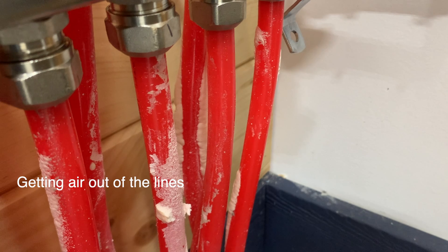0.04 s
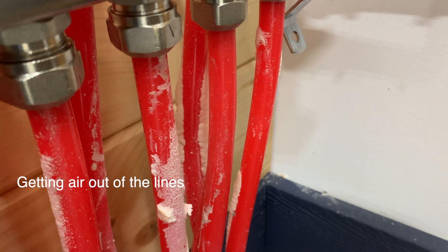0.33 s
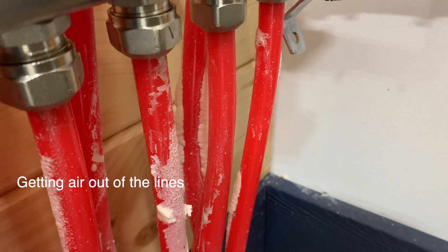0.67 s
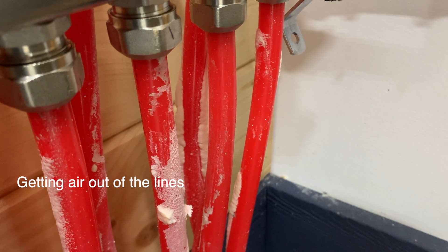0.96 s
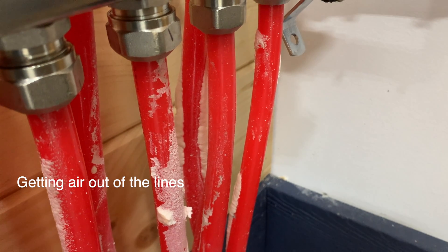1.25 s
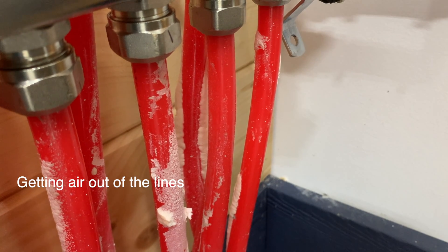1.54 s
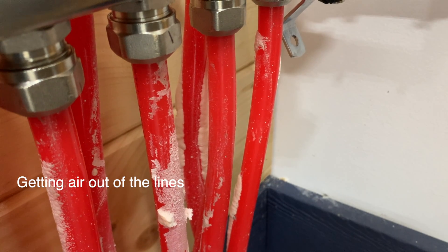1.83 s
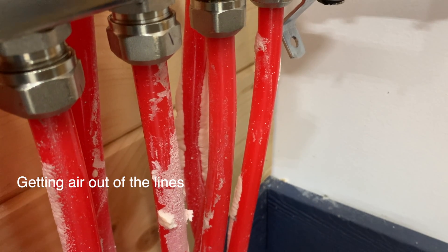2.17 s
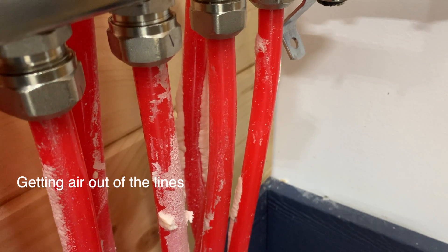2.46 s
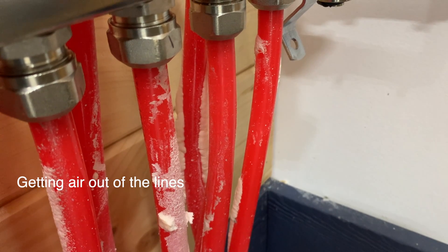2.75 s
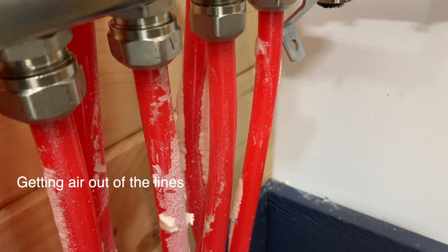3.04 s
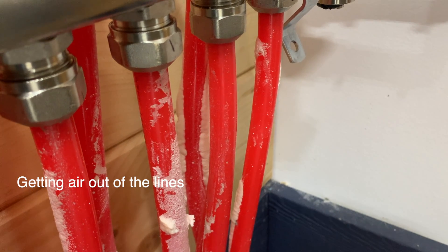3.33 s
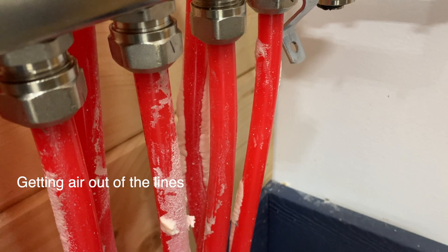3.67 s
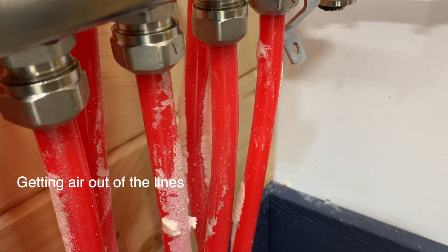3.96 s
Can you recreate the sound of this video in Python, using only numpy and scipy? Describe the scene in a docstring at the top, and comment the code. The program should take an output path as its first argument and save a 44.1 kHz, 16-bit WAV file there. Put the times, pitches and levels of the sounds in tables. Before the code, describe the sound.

Water rumbling and rushing through pipes, with gurgles of air over a steady pump hum.

```python
"""A small utility room, a stereo microphone close to plastic heating pipes being flushed of air.
From the start the pumped water surges in a deep rumble on the right, rushes and bubbles through the pipes
and hisses in the valves, over the pump's steady hum and thin whine. Air spits through a valve at once;
then low gurgles and higher spurts of fizz come and go, and air pockets churn the flow, hardest near 1.2 s.
The loudest gurgle comes near 2.75 s, and the water runs on to the end."""
import sys
import numpy as np
from scipy import signal
from scipy.fft import rfft, irfft
from scipy.io import wavfile
from scipy.ndimage import uniform_filter1d

SR = 44100
rng = np.random.default_rng(int(sys.argv[2]) if len(sys.argv) > 2 else 0)


def output_pcm(signal):
    """Save a mono or channel-first signal as 16-bit PCM at the path in sys.argv[1].

    Samples are clipped to [-1, 1] before scaling.
    """
    pcm = np.clip(np.atleast_2d(signal).T, -1, 1) * 32767
    wavfile.write(sys.argv[1], SR, np.round(pcm).astype(np.int16))


N = 176400
TIME = np.arange(N) / SR
FREQS = np.maximum(np.arange(N // 2 + 1) * SR / N, .1)


def undb(db):
    """Decibels to gain."""
    return 10 ** (np.asarray(db) / 20)


def colour(points):
    """Gain that gives white noise a spectrum of (frequency [Hz], density [dB per Hz]) points."""
    hz, db = np.array(points).T
    return undb(np.interp(np.log(FREQS), np.log(hz), db)) * np.sqrt(SR / 2)


def resonances(modes):
    """Gain of steep-sided resonances, each passing white noise at its own level."""
    power = 0
    for hz, width, db in modes:
        peak = 1 / (1 + ((FREQS / hz - hz / FREQS) * hz / width) ** 2) ** 2
        power = power + undb(db) ** 2 * peak / peak.mean()
    return np.sqrt(power)


def walk(hz):
    """Smooth random wander of spread 1."""
    hold = max(int(SR / hz), 2)
    steps = np.repeat(rng.standard_normal(N // hold + 2), hold)
    smooth = uniform_filter1d(uniform_filter1d(steps, hold), hold)[:N]
    return (smooth - smooth.mean()) / smooth.std()


def drift(sound, share, hz):
    """Let the pitch of a sound wander by a small share."""
    samples = np.arange(N)
    place = samples + np.cumsum(share * walk(hz))
    return np.array([np.interp(place, samples, side) for side in sound])


def ring(sound, t60_s, tail_db, channels):
    """Direct sound plus a dense decaying tail, at unchanged power."""
    tail = rng.standard_normal((channels, N)) * np.exp(-np.log(1000) * TIME / t60_s)
    tail *= undb(tail_db) / np.sqrt((tail ** 2).sum(axis=1, keepdims=True))
    return irfft(rfft(sound) * (1 + rfft(tail)) / np.sqrt(1 + undb(tail_db) ** 2), N)


def pan(db):
    """Channel gains that put the left db above the right."""
    return undb(np.array([[db], [-db]]) / 2)


# how the pipes reach the microphone's two sides (frequency [Hz], likeness [0-1], left lead [rad])
MIC_PATHS = [(40, .6, -.4), (58, .62, 1), (80, .92, 1.8), (125, .6, 3.2), (170, .7, 4.9), (250, .78, 5.7),
             (315, .78, 7.2), (430, .55, 9.9), (510, .6, 10), (660, .78, 8), (760, .9, 8.2),
             (1000, .68, 7.9), (1300, .55, 7), (1650, .75, 3.9), (2150, .55, 5.6), (2500, .25, 7.4),
             (2950, .55, 8.5), (3900, .25, 14), (5500, .2, 10.5), (7000, .42, 8.3), (8300, .45, 8.2),
             (8650, .7, 6.8), (9000, .95, 6.3), (9600, .95, 6.3), (10400, .85, 5), (15000, .8, 5)]

def mic_paths():
    """Likeness of the two sides and phase lead of the left, at every frequency."""
    hz, likeness, lead = np.array(MIC_PATHS).T
    return [np.interp(np.log(FREQS), np.log(hz), column) for column in (likeness, lead)]


def at_mic(sound):
    """One sound on both sides of the microphone, shifted in phase."""
    _, lead = mic_paths()
    return np.array([irfft(rfft(sound) * np.exp(1j * lead), N), sound])


def turbulence(gain):
    """Coloured noise on both sides of the microphone, partly alike and shifted in phase."""
    likeness, lead = mic_paths()
    right, unrelated = rfft(rng.standard_normal((2, N)))
    left = (likeness * right + np.sqrt(1 - likeness ** 2) * unrelated) * np.exp(1j * lead)
    return irfft(np.array([left, right]) * gain, N)


# the two low resonances of the pipe run (frequency [Hz], width [Hz], gain [dB])
PIPE_RUN_MODES = [(56.5, 17.5, 1.07), (80.5, 16.9, 0.3)]
# surges of the lower resonance (time [s], level [dB])
LOWER_SURGES = [(0.0, -38), (0.18, -31.5), (0.25, -40.5), (0.49, -30.5), (0.55, -35), (0.66, -33),
                (0.81, -42), (0.89, -23.0), (0.94, -41), (1.13, -28.5), (1.18, -42), (1.24, -28),
                (1.34, -38.5), (1.48, -36.5), (1.55, -39), (1.61, -28.5), (1.7, -39), (2.06, -29),
                (2.1, -40), (2.29, -28), (2.49, -38.0), (2.55, -26.5), (2.85, -33.5), (2.89, -32),
                (3.04, -38.5), (3.33, -31.5), (3.54, -38), (3.78, -29), (3.96, -32.5), (4.0, -33)]
# surges of the upper resonance (time [s], level [dB])
UPPER_SURGES = [(0.0, -33.5), (0.07, -29), (0.32, -38.5), (0.55, -31), (0.82, -36.5), (0.87, -32.5),
                (1.08, -37.5), (1.19, -28), (1.38, -34.5), (1.43, -32), (1.74, -34), (1.79, -42),
                (1.96, -34.5), (2.01, -53), (2.05, -25), (2.09, -39), (2.19, -30), (2.29, -35.5),
                (2.38, -33.0), (2.49, -46), (2.53, -29.5), (2.62, -46), (2.69, -33), (2.87, -29),
                (2.92, -41), (3.06, -27), (3.15, -36.5), (3.39, -26.0), (3.46, -34.5), (4.0, -39.5)]

def rumble():
    """Surging flow shakes the pipe run right of the microphone, each resonance swelling in its own time."""
    out = 0
    for (hz, width, db), surges in zip(PIPE_RUN_MODES, (LOWER_SURGES, UPPER_SURGES)):
        shake = turbulence(resonances([(hz, width, db)]))
        envelope = np.sqrt(uniform_filter1d(np.abs(signal.hilbert(shake[1])) ** 2, int(SR * 0.047)))
        shake = shake / envelope ** 0.7 * pan(-14.5)  # partly evened out, so the surges lead
        surge_db = np.interp(TIME, *np.array(surges).T)
        out = out + shake / shake.std() * undb(0.27 + db + surge_db)
    low_hz, high_hz = 39.8, 91.4
    band_loss = (1 + (low_hz / FREQS) ** 12) * (1 + (FREQS / high_hz) ** 16)
    return irfft(rfft(out) / np.sqrt(band_loss), N)


# water rushing in the pipes, close up (frequency [Hz], relative density [dB])
RUSH_SPECTRUM = [(20, -112), (45, -86), (95, -66), (110, -68), (135, -67), (165, -71.5), (185, -70),
                 (215, -73), (270, -74), (320, -68.5), (365, -70), (440, -69.5), (540, -81), (590, -75),
                 (780, -80), (850, -85), (1000, -81), (1450, -82), (1560, -80), (1680, -85), (2000, -84.5),
                 (2250, -85), (2400, -88), (3500, -94), (4600, -96), (9000, -110)]
FLUTTER_HZ = 22

def rush(churn_db):
    """Churning water, with its bubbles and ringing fittings, flutters in level; the small room answers."""
    water = turbulence(colour(RUSH_SPECTRUM)) * undb(0.5) + bubbles()
    pipes = water * undb(0.95 * churn_db) + gurgles() + fittings(churn_db)
    flutter = undb(0.72 * walk(FLUTTER_HZ))
    return ring(pipes * flutter, t60_s=0.32, tail_db=-5.5, channels=2)


# swarms of air bubbles (centre [Hz], spread each way [octaves], rate [1/s], ring [cycles], level [dB])
BUBBLE_SWARMS = [(348.4, 0.227, 12, 30, -60), (1305, 0.133, 45, 100, -62.5), (1962, 0.133, 45, 95, -62)]

def bubbles():
    """Air bubbles ring at random moments, each rising a little in pitch as it dies."""
    scatter_db, chirp = 0.5, 0.03
    out = np.zeros(N)
    for centre_hz, spread, rate, cycles, db in BUBBLE_SWARMS:
        swarm = np.zeros(N)
        for when, pitch_draw, size_draw in rng.random((400, 3))[:int(rate * N / SR)]:
            hz = centre_hz * 2 ** (spread * (2 * pitch_draw - 1))
            start = int(when * N)
            length = min(int(cycles / hz * SR), N - start)
            age = np.arange(length) * hz / SR / cycles  # 0 to 1 over the ring
            envelope = np.exp(-np.log(100) * age) * (1 - np.exp(-age * cycles / 2))
            strength = undb(-scatter_db * np.log(1 - .97 * size_draw))
            tone = np.sin(2 * np.pi * cycles * age * (1 + chirp * age))
            swarm[start:start + length] += strength * envelope * tone
        out += swarm / swarm.std() * undb(db)
    return at_mic(out)


# resonances of pipes and fittings (frequency [Hz], width [Hz], level [dB])
FITTING_MODES = [(314, 35, -59), (455, 47, -66), (648.6, 18, -63), (700, 13, -66), (755, 61, -60.5),
                 (1135, 52, -63), (1223, 39, -63.5), (1288, 56, -58), (1380, 180, -64.5), (1756, 37, -63.5),
                 (1805, 45, -59), (1928, 75, -59.5), (2255, 31, -67.5), (2936, 280, -60)]

def fittings(churn_db):
    """The flow rings pipes and fittings, which waver in pitch and flare as air passes through."""
    drive = rfft(turbulence(1))
    out = 0
    for mode in FITTING_MODES:
        ringing = drift(irfft(drive * resonances([mode]), N), share=0.003986, hz=12)
        out = out + ringing * undb(2.13 * walk(hz=16) + 0.21 * churn_db)
    return out


# hiss of the valves, close up (frequency [Hz], relative density [dB])
HISS_SPECTRUM = [(2000, -102), (4150, -89), (4550, -93.5), (5400, -90), (5900, -87.5), (7000, -86.5),
                 (8300, -91), (9200, -86.5), (10250, -88), (10700, -122), (12200, -101), (12900, -91),
                 (13500, -104), (15500, -104)]
# resonances of the valve bodies (frequency [Hz], width [Hz], level [dB])
VALVE_BODY_MODES = [(3264, 67, -68), (4170, 110, -74.5), (5000, 98, -79), (5680, 130, -69),
                    (6370, 160, -64.5), (6817, 64, -62.5), (7040, 130, -71.5), (7170, 160, -67.5),
                    (7960, 70, -65), (8500, 70, -71.5), (9100, 80, -64.5), (9420, 120, -72.5),
                    (10000, 46, -84), (10300, 300, -64)]

def hiss(churn_db):
    """Water squeezes through the valves; the metal rings briefly with it."""
    valves = ring(turbulence(colour(HISS_SPECTRUM)), t60_s=0.17, tail_db=-3.5, channels=1)
    drive = rfft(turbulence(1))
    for mode in VALVE_BODY_MODES:
        valves = valves + irfft(drive * resonances([mode]), N) * undb(3 * walk(hz=9.2))
    return valves * undb(-2 + 0.2 * churn_db + 0.5 * walk(FLUTTER_HZ))


# mains hum, rotor and whine (frequency [Hz], level [dB], left over right [dB], left lead [rad])
PUMP_TONES = [(120, -51.5, -14, -2), (195.2, -52.5, -4.5, -0.98), (241, -61.5, 3.5, -1.3),
              (360, -60, -3, -1.6), (389, -57, -0.5, 2), (1018, -69.5, 0, 0.7), (2139, -64, 7.5, -1.8)]

def pump():
    """Steady tones of the pump, wavering slightly with its load."""
    drifting_time = np.cumsum(1 + 0.00062 * walk(hz=5.05)) / SR
    out = 0
    for hz, db, pan_db, lead in PUMP_TONES:
        phase = 2 * np.pi * (hz * drifting_time + rng.random()) + np.array([[lead], [0]])
        level = undb(db + 2.6 * walk(hz=13))
        out = out + np.sqrt(2) * np.sin(phase) * level * pan(pan_db)
    return out


# valve metal rung by a spit of air (frequency [Hz], width [Hz], level [dB])
SPIT_RESONANCES = [(707, 31, -43), (1290, 90, -47), (4430, 110, -50), (5440, 2200, -50)]

def spit():
    """A pocket of air spits through a valve and rings the metal."""
    start_s, attack_s, decay_s = 0.0071, 0.015, 0.06
    age = np.maximum(TIME - start_s, 0)
    envelope = np.minimum(age / attack_s, 1) * np.exp(-age / decay_s)
    return turbulence(resonances(SPIT_RESONANCES)) * envelope


# low gurgles and short, higher spurts of fizzing bubbles (time [s], pitch [Hz], half-length [s], level [dB])
GURGLES = [(0.127, 319.5, 0.024, -49), (.59, 337, 0.031, -51), (0.934, 323, 0.042, -48),
           (1.15, 305.4, 0.051, -54), (1.19, 447, .05, -53), (1.944, 311, .03, -51),
           (2.287, 319.4, .03, -50.5), (2.49, 306, 0.022, -47), (2.544, 292, 0.038, -48.5),
           (2.75, 310.4, 0.065, -45), (3.01, 338, 0.049, -50.5), (3.165, 303, .025, -50),
           (.78, 1960, .035, -56), (1.12, 721, .04, -49), (1.15, 1290, 0.081, -62),
           (1.584, 1300, 0.047, -57), (1.656, 1258, .06, -57), (2.24, 1266, .07, -57.5),
           (2.48, 1278, 0.029, -58), (2.83, 1836, 0.033, -59), (3.348, 1914, 0.046, -59),
           (3.375, 1262, 0.077, -59), (3.61, 1286, 0.033, -58)]

def gurgles():
    """Gurgles and spurts of fizz swell and fade, wobbling as the bubbles tumble along the pipe."""
    wobble_share, wobble_hz, rough_db = 0.0205, 69.05, 4
    wobbling_time = np.cumsum(1 + wobble_share * walk(wobble_hz)) / SR
    out = np.zeros(N)
    for when, hz, half, db in GURGLES:
        near = np.abs(TIME - when) < 3 * half
        envelope = undb(db) * np.exp(-((TIME[near] - when) / half) ** 2)
        out[near] += envelope * np.sin(2 * np.pi * hz * wobbling_time[near])
    return at_mic(np.sqrt(2) * out * undb(rough_db * walk(wobble_hz)))


# air pockets passing the microphone (time [s], half-length [s], churning [dB])
AIR_POCKETS = [(0.442, 0.071, 1), (.77, 0.025, 1), (1.176, 0.071, 3), (2.263, 0.039, -0.5),
               (2.518, 0.074, 1.5), (2.805, 0.047, 0), (3.35, 0.059, 0.6)]

def churning():
    """Passing air pockets churn the water: dB about the mean, of which each flow sound takes a share."""
    churn_db = sum(db * np.exp(-((TIME - when) / half) ** 2) for when, half, db in AIR_POCKETS)
    return churn_db - churn_db.mean()


def scene():
    """Beside the pipes: rumble, rush and hiss of one flow, with the pump and one spit of air."""
    churn_db = churning()
    return rumble() + rush(churn_db) + hiss(churn_db) + pump() + spit()


def record(dry):
    """The recorder cuts the top steeply."""
    top_hz = 15400
    return signal.sosfilt(signal.ellip(8, .2, 70, top_hz, fs=SR, output="sos"), dry)


dry = scene()
out = record(dry)
output_pcm(out)
```